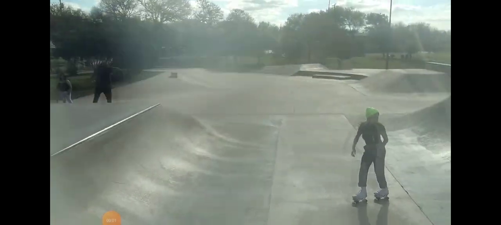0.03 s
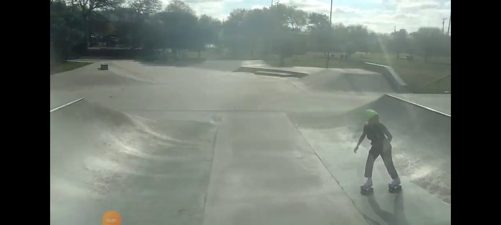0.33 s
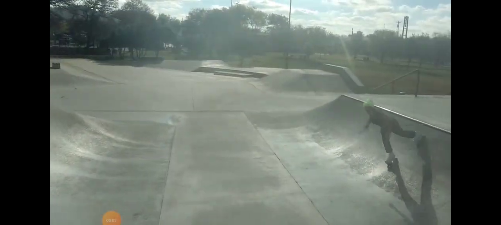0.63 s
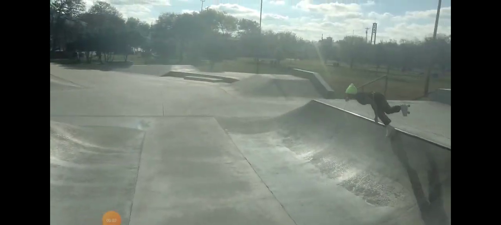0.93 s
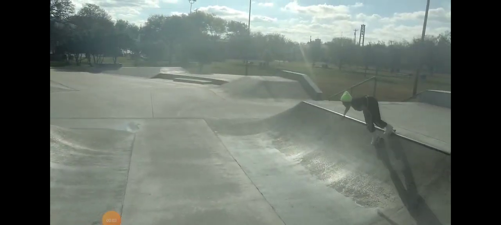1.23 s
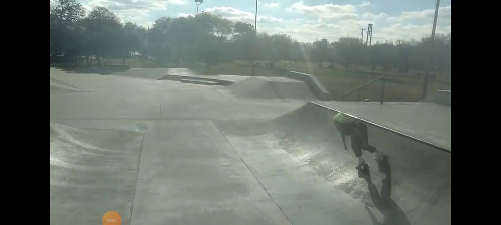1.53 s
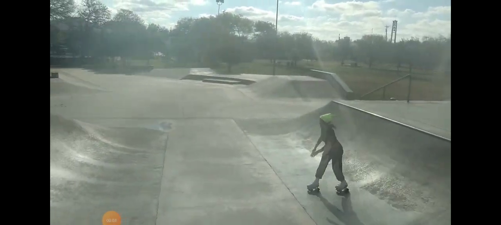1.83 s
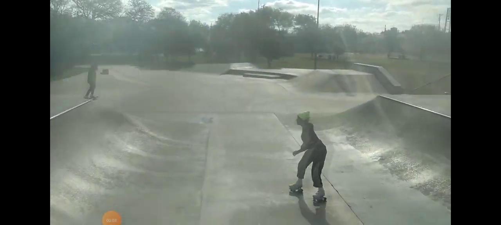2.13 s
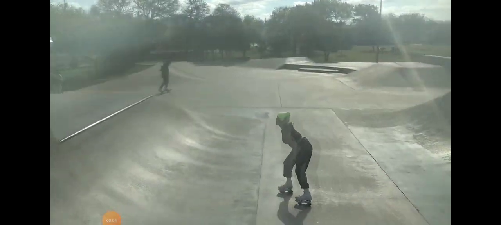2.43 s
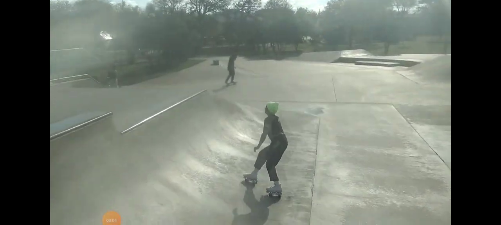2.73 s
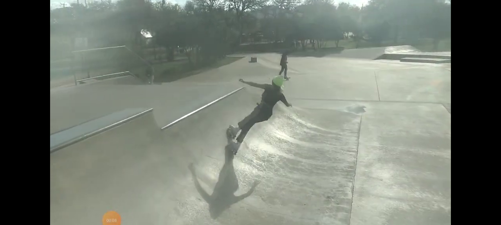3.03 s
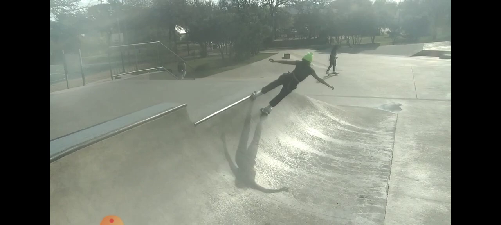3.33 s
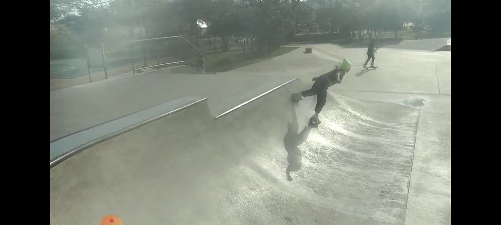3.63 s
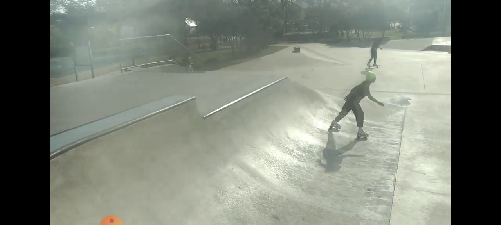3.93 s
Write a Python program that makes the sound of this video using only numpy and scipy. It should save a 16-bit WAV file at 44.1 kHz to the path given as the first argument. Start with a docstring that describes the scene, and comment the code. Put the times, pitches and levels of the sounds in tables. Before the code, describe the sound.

Roller skate wheels rumble over gritty concrete in an outdoor skatepark. They clack, scuff and land with a thud, quieten briefly, then roll louder with a ringing tone and more clacks. A small microphone catches short echoes.

```python
"""Hard skate wheels rumble over gritty concrete and clack on seams and landings.
A roller skater rides up one bank of an outdoor bowl, steps round at its edge, rolls back and climbs
the other bank. Roughness and impacts set the wheels ringing; sideways slips make them chirp and scuff,
and the skater's weight lands with a thud. The concrete throws short echoes, and a small microphone
with a limiter listens over a low outdoor rumble."""
import sys
import numpy as np
from scipy import signal
from scipy.fft import rfft, irfft
from scipy.io import wavfile
from scipy.ndimage import uniform_filter1d, minimum_filter1d, map_coordinates

SR = 44100
rng = np.random.default_rng(int(sys.argv[2]) if len(sys.argv) > 2 else 0)


def master(y):
    """Save y as 16-bit WAV."""
    cut = np.clip(np.atleast_2d(y).T, -1, 1)
    pcm = np.round(cut * 32767)  # scale
    wavfile.write(sys.argv[1], SR, pcm.astype(np.int16))


N = 176400

# Rolling noise. Each row: time in seconds, then low, middle, upper middle and treble level in relative dB.
ROLL_LEVELS = [(0,-44,-28.5,-38,-53),(.26,-40,-26.5,-37.5,-48),(.44,-33,-24,-34,-49),(.56,-40.5,-27.5,-35.5,-51.5),(.64,-39.5,-22,-27.5,-46),(.8,-35,-23,-30,-44),(.89,-39,-33.5,-47,-55),(1.0,-34,-27,-38.5,-47),(1.12,-50.5,-36.5,-49,-56),(1.22,-68,-43.5,-45,-49),(1.36,-44.5,-35,-47,-55),(1.45,-51,-26.5,-37.5,-44),(1.52,-70,-35,-42,-49),(1.565,-28.5,-43,-39,-40),(1.62,-50,-34,-43,-56),(1.75,-41.5,-23,-32,-43),(1.96,-39,-23,-32.5,-38),(2.2,-34.5,-23,-36,-36),(2.28,-42,-23,-38,-45),(2.63,-41.5,-26.5,-42.5,-43.5),(2.82,-34,-19.5,-32,-36),(2.97,-31,-19.5,-31,-41),(3.2,-41.5,-18.5,-28,-36),(3.38,-38,-23,-33.5,-32),(3.48,-38.5,-32,-41.5,-51),(3.6,-52.5,-33,-42,-43.5),(3.76,-38.5,-28.5,-33.5,-40),(3.86,-37,-23,-32.5,-41),(4,-37,-24.5,-37.5,-40)]
JUDDER_HZ, JUDDER_DB = 63.5, 1  # rate and depth of the wheels' random judder


def amp(db):
    """Decibels convert to an amplitude ratio."""
    return 10 ** (np.asarray(db) / 20)


def unit(x):
    """Normalisation sets the rms to 1."""
    return x / np.sqrt(np.mean(x ** 2) + 1e-20)


def at_level(x, db):
    """A transient's level is its energy averaged over 8 ms."""
    return amp(db) * x / np.sqrt(np.sum(x ** 2) / (.008 * SR))


def add(mix, start_s, sound):
    """Superposition: a sound adds to the mix from its start time."""
    part = mix[max(round(start_s * SR), 0):][:len(sound)]
    part += sound[:len(part)]


def curve(table, column):
    """Linear interpolation gives a column of a time table at every sample."""
    rows = np.array(table)
    return np.interp(np.arange(N) / SR, rows[:, 0], rows[:, column])


def colour(x, points):
    """A minimum-phase filter imposes a spectrum of (Hz, dB) points."""
    size = 4096
    hz, db = np.transpose(points)
    log_hz = np.log(abs(np.fft.fftfreq(size, 1 / SR)) + 1)
    log_gain = np.log(amp(np.interp(log_hz, np.log(hz), db)))
    taps = np.fft.ifft(np.exp(np.conj(signal.hilbert(log_gain)))).real
    return signal.fftconvolve(x, taps[:size // 2])[:len(x)]


def lowpass(x, hz, order=2):
    """A zero-phase low-pass smooths without delay."""
    return irfft(rfft(x) / (1 + (np.fft.rfftfreq(len(x), 1 / SR) / hz) ** (2 * order)), len(x))


def wander(hz, size=N):
    """Low-passed noise fluctuates at random up to a given rate."""
    return unit(lowpass(rng.standard_normal(size), hz))


def resonate(x, hz, width_hz):
    """Two resonators in cascade give a steep peak; the output has an rms of 1."""
    b, a = signal.iirpeak(hz, hz / width_hz, SR)
    return unit(signal.lfilter(b, a, signal.lfilter(b, a, x)))


def background():
    """Ambient noise, strongest at low frequencies, lies under everything with a faint pure-tone hum."""
    # Outdoor rumble. Each row: frequency in Hz, spectral density in relative dB.
    air_spectrum = [(10,-2),(25,8),(45,-8.5),(70,-10.5),(110,-15.5),(170,-30),(280,-27),(700,-26),(2000,-42),(15000,-60)]
    rumble = unit(colour(rng.standard_normal(N), air_spectrum))
    hum = np.sqrt(2) * np.sin(2 * np.pi * 120.7 * np.arange(N) / SR)
    return amp(-43) * rumble + amp(-59.5) * hum


def bowl(x):
    """Convolution adds early reflections off the concrete and a faint, exponentially decaying tail."""
    # Each row: delay in seconds, level in dB relative to the direct sound.
    reflections = [(.0068,-30.5),(0.0101,-18),(.019,-24.5)]
    t60_s = 0.33
    t = np.arange(SR // 2) / SR
    tail = rng.standard_normal(len(t)) * np.exp(-np.log(1000) * t / t60_s)
    response = amp(-15) * tail / np.linalg.norm(tail)
    response[0] = 1  # direct sound
    for delay_s, db in reflections:
        add(response, delay_s, amp([db]))
    return signal.fftconvolve(x, response)[:N]


def sliding_echo(x, path):
    """A dull reflection shifts in delay as the length of its path changes."""
    delay = curve(path, 1) * SR / 1000
    return map_coordinates(lowpass(x, hz=4560), [np.arange(N) - delay], order=3)


def spinning():
    """Lifted wheels spin freely at the top of the bank; a resonance narrows their noise to a thin ring."""
    start_s, size = 1.17, int(0.93 * SR)
    ring = resonate(rng.standard_normal(size), hz=1540, width_hz=332)
    out = np.zeros(N)
    add(out, start_s, amp(-31) * signal.windows.tukey(size, .5) * ring)
    return out


def ticks():
    """Loose grains snap as a Poisson process of uneven rate, their level following the rolling treble."""
    # Snap of a grain. Each row: frequency in Hz, spectral density in relative dB.
    snap_spectrum = [(700,-36),(3000,4),(6500,-0.5),(15000,-7.5)]
    ticks_per_s, spread_db, fade_s = 110, 9, .001
    sizes = amp(spread_db * np.minimum(rng.exponential(1, N), 2))
    hits = sizes * (rng.random(N) < ticks_per_s * amp(JUDDER_DB * wander(JUDDER_HZ)) / SR)
    envelope = signal.lfilter([1], [1, -np.exp(-1 / (fade_s * SR))], hits)
    snaps = unit(colour(envelope * rng.standard_normal(N), snap_spectrum))
    return snaps * amp(curve(ROLL_LEVELS, 4) - 6)


def scuffs():
    """Sliding friction: dragged wheels give short swells of chattering noise."""
    # Each row: start in seconds, length in seconds, level at the crest in dB.
    drags = [(.775,0.055,-19.5),(.96,0.031,-26.5),(1.383,0.054,-26.5),(1.462,0.031,-22),(2.16,0.063,-23.5),(3.345,0.046,-21.5)]
    # Friction noise. Each row: frequency in Hz, spectral density in relative dB.
    friction_spectrum = [(200,-39),(800,-12),(1300,5.5),(1650,-1.5),(2300,-2),(3000,-10),(4200,-9.5),(6500,-23.5),(15000,-31)]
    out = np.zeros(N)
    for start_s, length_s, db in drags:
        size = int(length_s * SR)
        chatter = amp(JUDDER_DB * wander(2 * JUDDER_HZ, size))
        friction = unit(colour(rng.standard_normal(size) * chatter, friction_spectrum))
        add(out, start_s, amp(db) * signal.windows.tukey(size, .7) * friction)
    return out


def chirps():
    """Stick-slip oscillation: a wheel sliding sideways sounds a brief tone."""
    # Each row: start in seconds, length in seconds, pitch in Hz, peak level in dB.
    slips = [(.5122,0.0087,1625,-10),(.8375,0.008,2120,-11.5),(1.0603,0.0084,1930,-8.5),(1.5925,0.0063,2146,-7),(3.1355,0.014,1377,-12.5),(3.1595,0.0084,1410,-5),(3.203,0.006,1384,-5.5),(3.693,0.0087,2890,-13),(3.832,0.008,1416,-8)]
    out = np.zeros(N)
    for start_s, length_s, hz, db in slips:
        t = np.arange(0, length_s, 1 / SR)
        add(out, start_s, amp(db) * signal.windows.tukey(len(t), .5) * np.sin(2 * np.pi * hz * t))
    return out


def contact(t, fade_s):
    """Impact excitation comes as two noise bursts: the front axle, then the louder rear one."""
    gap_s = 0.0038 * rng.uniform(0.76, 1.15)
    front = amp(-4) * np.exp(-t / fade_s)
    rear = (t > gap_s) * np.exp(-abs(t - gap_s) / fade_s)
    return (front + rear) * rng.standard_normal(len(t))


def thuds():
    """The skater's weight lands as a pressure pulse with a slow rebound and excites the hollow boot."""
    # Each row: start in seconds, thud level in dB, boot level in dB.
    footfalls = [(.840,-17,-23),(.869,-50,-26),(1.064,-34,-41),(1.288,-25,-36),(1.311,-25.5,-35),(1.595,-27.5,-26.5),(3.551,-28,-38),(3.701,-30,-46)]
    # Body of the boot. Each row: frequency in Hz, spectral density in relative dB.
    boot_spectrum = [(60,-21),(230,-13),(430,-4.5),(850,4),(1300,-7),(4000,-59)]
    rise_s, rebound_delay_s, rebound_s = 0.0049, 0.022, 0.12
    t = np.arange(SR // 5) / SR
    pulse = t / rise_s * np.exp(1 - t / rise_s)
    rebound = amp(-10.5) * np.sin(np.pi * np.clip((t - rebound_delay_s) / rebound_s, 0, 1))
    out = np.zeros(N)
    for start_s, thud_db, boot_db in footfalls:
        rattle = amp(-16) * wander(hz=300, size=len(t))
        push = pulse * (rattle - 1)
        boot = colour(contact(t, fade_s=0.0045), boot_spectrum)
        add(out, start_s, amp(thud_db) * (push + rebound) + at_level(boot, boot_db))
    return out


def knock(t, hz):
    """Damped vibration: wheel and plate ring in quick bounces over a short resonant rattle."""
    # Front axle, rear axle and rebound. Each row: nominal delay in seconds, level in relative dB.
    bounces = [(.0007,-6),(.0036,-0.5),(.0088,-6)]
    # Drive of the rattle. Each row: frequency in Hz, spectral density in relative dB.
    drive_spectrum = [(100,-35),(300,-27),(600,-7),(1000,2),(1600,-2.5),(2200,3.5),(2800,-2),(4500,3.5),(15000,-69)]
    width_hz, rise_s, spread = 420, .0013, 0.115
    drive = colour(contact(t, fade_s=0.0032), drive_spectrum)
    rattle = signal.lfilter(*signal.iirpeak(hz, hz / width_hz, SR), drive)
    ring = np.zeros(len(t))
    for delay_s, db in bounces:
        onset_s = delay_s * (1 + spread * rng.uniform(-1.06, 1))
        age = np.maximum(t - onset_s, 0) / rise_s
        pitch_hz = hz * (1 + spread * rng.uniform(-1.005, 1))
        envelope = amp(db) * (age * np.exp(1 - age)) ** 2
        ring += envelope * np.sin(2 * np.pi * (pitch_hz * t + rng.random()))
    return unit(ring) + amp(-2.5) * unit(rattle)


def clacks():
    """A hard impact on a seam or a landing radiates a broadband crack and a pitched knock."""
    # Each row: start in seconds, crack and knock levels in relative dB, nominal knock pitch in Hz.
    impacts = [(.169,-32.5,-28,1590),(.282,-25.5,-19.5,1620),(.3098,-22.5,-12,1502),(.3735,-27.5,-20,1070),(.405,-18,-15.5,1320),(.4293,-29,-25,1610),(.768,-30,-16.5,1364),(.7872,-33,-14.5,2330),(.8356,-17.5,-9.5,1677),(.866,-20.5,-5.5,1432),(1.060,-20.5,-15,1847),(1.119,-51,-26.5,1485),(1.245,-23,-11,1647),(1.273,-21,-11.5,1658),(1.2855,-19.5,-5.5,1604),(1.3055,-28,-11,1592),(1.3932,-34,-22.5,1560),(1.4095,-29,-14.5,1677),(1.475,-37,-20,1630),(1.4865,-37,-18,1495),(1.5495,-27.5,-14,1400),(1.5898,-22,-12,1486),(1.6554,-32,-19,1614),(2.0808,-16.5,-13.5,1244),(2.119,-28,-17,1580),(2.1715,-26,-27,1370),(2.456,-23.5,-20,1590),(2.671,-21,-16.5,1410),(2.697,-24.5,-16,1364),(2.7395,-25.5,-17,1310),(2.7708,-22.5,-17,1327),(3.2849,-41,-15.5,1360),(3.3895,-29,-19,2160),(3.409,-25,-14.5,1504),(3.4492,-29,-18.5,1540),(3.5098,-27,-28,1210),(3.526,-24.5,-11,1460),(3.5453,-20.5,-9.5,1464),(3.6701,-28.5,-20.5,1390),(3.693,-19,-16,1370),(3.7006,-35,-11,1485),(3.7404,-30,-17,1380),(3.8695,-32,-13,1460),(3.911,-35,-12.5,1410),(3.976,-40,-18.5,1390)]
    # Crack of contact. Each row: frequency in Hz, spectral density in relative dB.
    crack_spectrum = [(100,-29),(400,1),(900,-9),(2200,11),(3600,7),(6200,7),(10000,-0.5),(13000,3.5),(15500,-3.5)]
    t = np.arange(SR // 20) / SR
    out = np.zeros(N)
    for start_s, crack_db, knock_db, hz in impacts:
        crack = colour(contact(t, fade_s=0.0041), crack_spectrum)
        add(out, start_s, at_level(crack, crack_db + 1) + at_level(knock(t, hz), knock_db - 1))
    return out


def ringing():
    """Forced vibration: roughness and bumps drive the wheels' damped modes and a bright whirr."""
    # Each row: frequency in Hz, resonator width in Hz, level in relative dB.
    modes = [(1427,202,1.5),(2098,310,-7.5)]
    # Ring of the wheels pressed into the bank. Each row: time in seconds, level in dB.
    ring_levels = [(0,-56),(1.1,-48),(1.7,-34),(2.6,-34.5),(2.75,-25.5),(3.1,-27),(3.15,-19),(3.22,-17.5),(3.38,-28.5),(3.48,-36),(3.65,-27),(3.83,-19),(4,-32)]
    # Each row: time in seconds, level of the whirr in dB.
    whirr_levels = [(0,-46.5),(.8,-56),(1.1,-83),(1.8,-47.5),(2.6,-49.5),(3.1,-40.5),(3.24,-46),(3.39,-32.5),(3.5,-66),(3.75,-39),(4,-39)]
    bumps_per_s, load_hz, detune = 110, 8, .015
    bumps = unit(rng.choice([-1, 1], N) * (rng.random(N) < bumps_per_s / SR))
    shake = rng.standard_normal(N) * amp(JUDDER_DB * wander(JUDDER_HZ)) + amp(4.5) * bumps
    ring = unit(sum(amp(db) * resonate(shake, hz, width_hz) for hz, width_hz, db in modes))
    whirr = resonate(shake * amp(3 * wander(JUDDER_HZ / 2)), hz=6130, width_hz=420)
    warped_time = np.cumsum(1 + detune * wander(load_hz))  # the pitch shifts with the wavering load
    ring = map_coordinates(ring, [warped_time], mode="mirror")
    return ring * amp(curve(ring_levels, 1)) + whirr * amp(curve(whirr_levels, 1))


def rolling():
    """Roughness and grit shake the juddering wheels; bank and floor echoes comb-filter the noise."""
    # Wheels and skate on concrete. Each row: frequency in Hz, spectral density in relative dB.
    wheel_spectrum = [(60,-51),(250,-69.5),(350,-27),(500,-21),(680,-13.5),(820,-5),(1150,-2),(1380,-0.5),(1660,-2),(1880,-11.5),(2150,-13),(2600,-20),(3100,-12.5),(3900,-17.5),(6200,-22.5),(10000,-36),(15500,-38)]
    # Reflection off the bank. Each row: time in seconds, delay in ms, share of the amplitude.
    bank_path = [(0,0.54,0.23),(.88,1.17,0.037),(1.14,1.92,1),(1.3,2.4,0.26),(1.52,2.1,0.34),(1.75,0.99,0.2),(3.3,0.84,0.033),(3.6,2.36,0.14),(4,0.84,0.072)]
    # Reflection off the floor. Each row: time in seconds, delay in ms.
    floor_path = [(0,2.66),(.5,1.97),(1.05,4.07),(1.5,3.15),(1.85,2.22),(2.4,2.5),(2.9,2.08),(3.3,0.95),(3.65,0.98),(4,1.13)]
    # Crossovers between the four bands in Hz, and each band's gain in dB.
    edges_hz = [700, 2500, 7800]
    band_gains_db = [-0.29, 0.35, -0.62, -1.1]
    grit_per_s, spread_db, floor_share, band_judder_db = 900, -0.5, 0.23, 0.86
    sizes = amp(spread_db * np.minimum(rng.exponential(1, N), 4.5)) * rng.choice([-1, 1], N)
    grit = unit(sizes * (rng.random(N) < grit_per_s / SR))
    roughness = rng.standard_normal(N) + amp(-3.5) * grit
    direct = colour(roughness * amp(JUDDER_DB * wander(JUDDER_HZ)), wheel_spectrum)
    bank_echo = curve(bank_path, 2) * sliding_echo(direct, bank_path)
    rest = direct - bank_echo + floor_share * sliding_echo(direct, floor_path)
    out = np.zeros(N)
    for k, gain_db in enumerate(band_gains_db):  # split off the bands from low to high
        band = lowpass(rest, edges_hz[k], order=6) if k < len(edges_hz) else rest
        rest = rest - band
        judder = amp(band_judder_db * wander(JUDDER_HZ))
        out += unit(band * judder) * amp(curve(ROLL_LEVELS, k + 1) + gain_db)
    return out


def scene():
    """The sounds of the skates superpose and reflect in the bowl, over the background."""
    skates = rolling() + ticks() + ringing() + spinning() + clacks() + scuffs() + chirps() + thuds()
    return (bowl(skates) + background())[None]


def record(dry):
    """The microphone's response colours the sound, a fast limiter holds peaks, a low-pass ends the band."""
    # Each row: frequency in Hz, gain in dB.
    mic_response = [(20,-2.5),(3900,-0.5),(4400,-10),(5450,-5.5),(6150,0),(7050,-2.5),(7800,-14),(8600,-9.5),(9300,-4),(10200,1.5),(11200,-6.5),(12300,-17.5),(13800,-17),(14600,1),(15300,1.5),(15900,-19)]
    ceiling_db, window, cutoff_hz = -6.5, int(0.0017 * SR), 15900
    x = colour(dry[0], mic_response)
    overshoot = np.maximum(abs(x) / amp(ceiling_db), 1)
    gain = uniform_filter1d(minimum_filter1d(1 / overshoot, window), window)
    taps = signal.firwin(511, cutoff_hz, window=("kaiser", 9), fs=SR)
    return signal.fftconvolve(x * gain, taps, "same")[None]


dry = scene()
out = record(dry)
master(out)
```